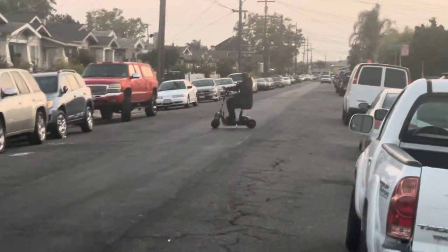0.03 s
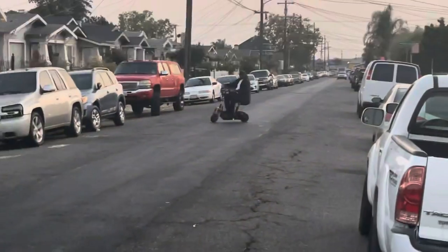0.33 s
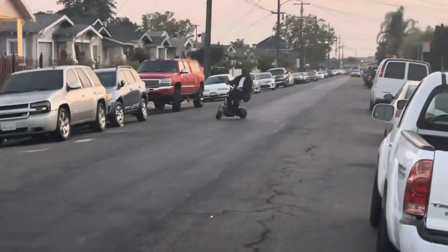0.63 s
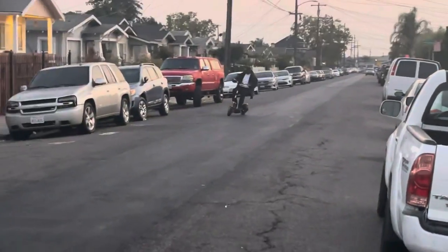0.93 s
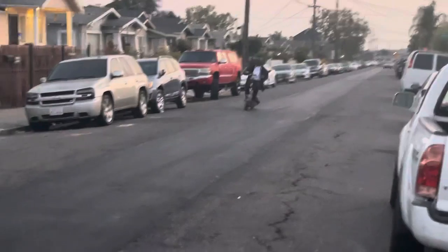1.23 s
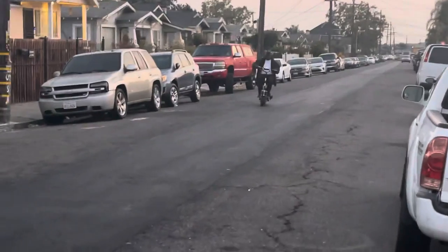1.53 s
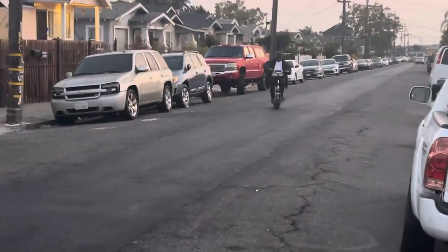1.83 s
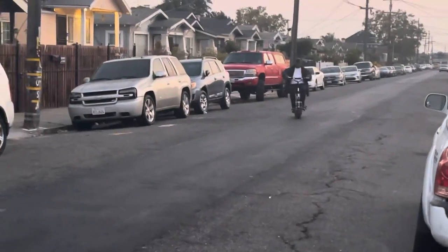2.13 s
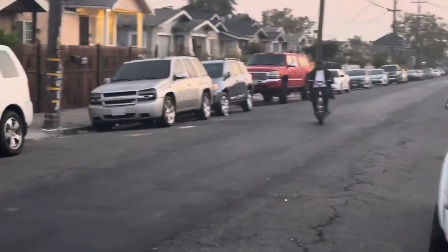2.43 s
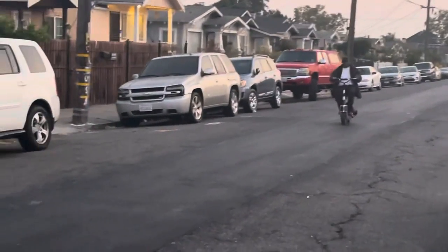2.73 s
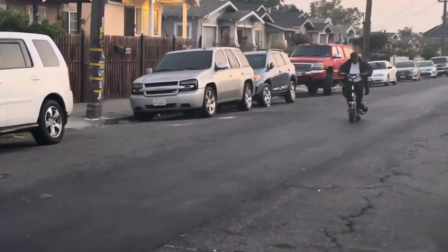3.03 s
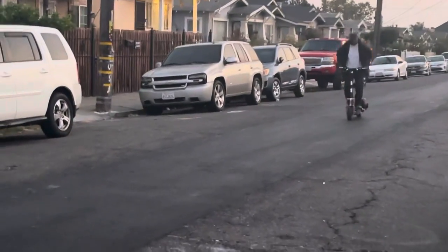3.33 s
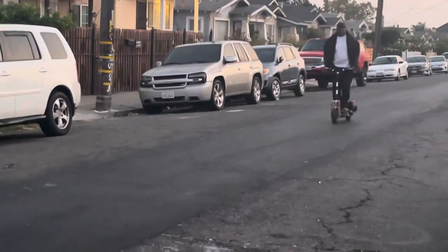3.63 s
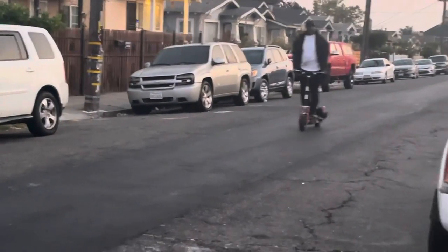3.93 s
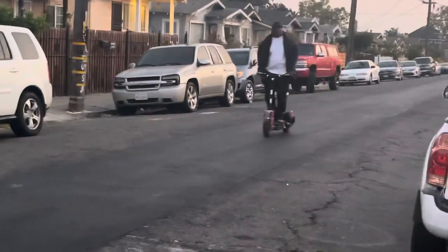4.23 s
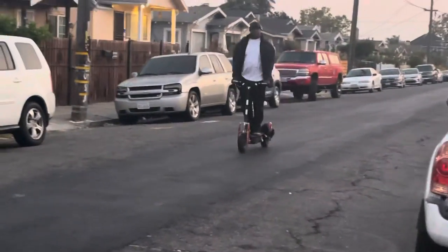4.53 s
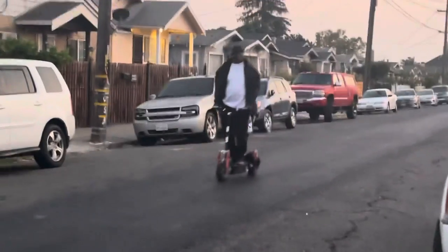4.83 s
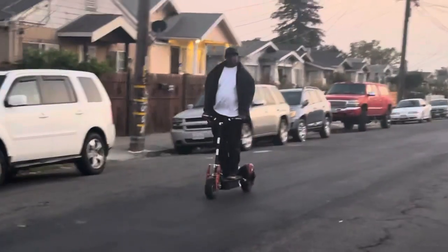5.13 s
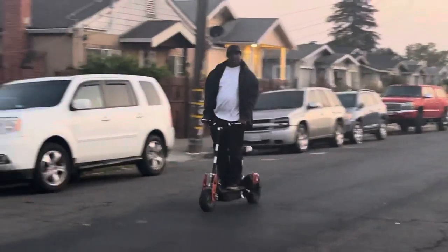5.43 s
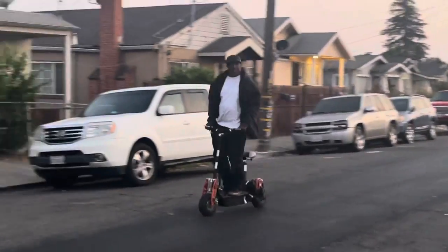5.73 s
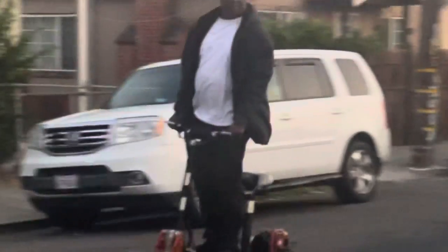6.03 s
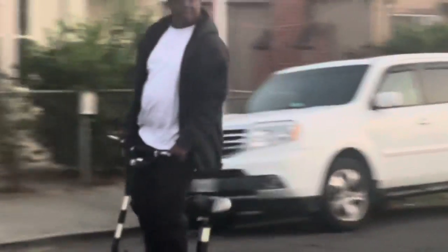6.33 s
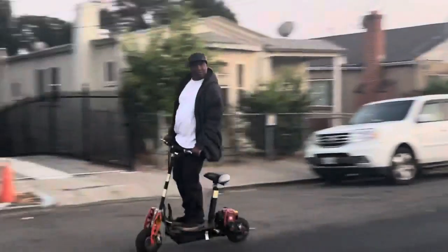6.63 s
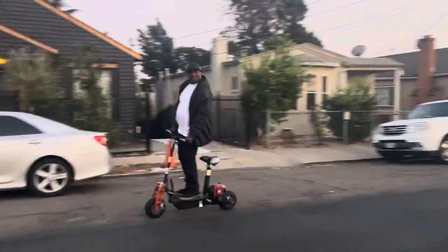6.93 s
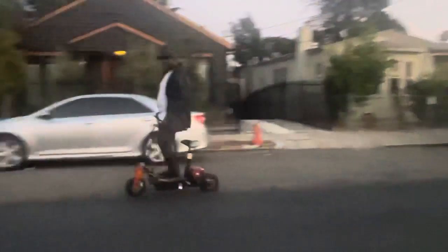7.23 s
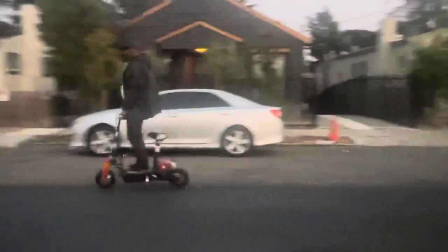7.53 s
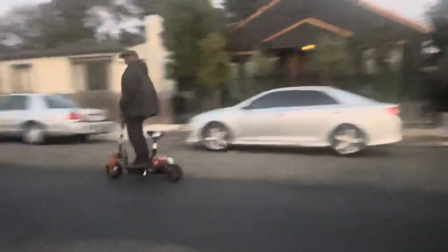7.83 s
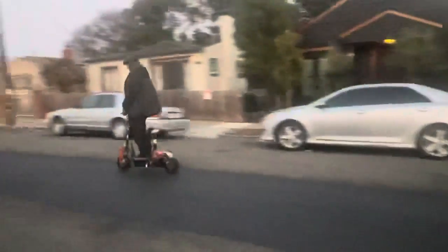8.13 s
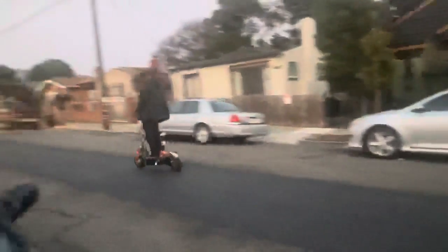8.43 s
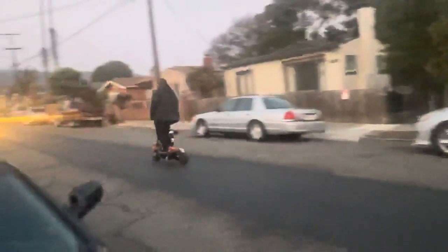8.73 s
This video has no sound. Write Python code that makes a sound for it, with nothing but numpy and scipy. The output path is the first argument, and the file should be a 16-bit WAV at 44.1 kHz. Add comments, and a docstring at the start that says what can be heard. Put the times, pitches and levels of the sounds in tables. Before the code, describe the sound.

The puttering engine of a motorized scooter builds to a loud buzzing drone as it nears, passes and starts to move away.

```python
"""A stand-up scooter with a small four-stroke engine idles far down a quiet street, opens up, passes close.
Exhaust pulses drone in the muffler, the valve gear clatters once a cycle and the drive chain whines in
bursts; all follow engine speed, distance and angle. The road and house fronts throw the sound back.
Under it lie the hush of the town and one hollow knock. The hand-held two-port microphone picks up
soft bumps, mostly at first, and low gusts as it swings round."""
import sys
import numpy as np
from scipy import signal
from scipy.fft import rfft, irfft, next_fast_len
from scipy.io import wavfile
from scipy.ndimage import uniform_filter1d, map_coordinates

SR = 44100
rng = np.random.default_rng(int(sys.argv[2]) if len(sys.argv) > 2 else 0)


def dump_mix(stems):
    """Bounce the given channels to the path in sys.argv[1] as a 16-bit WAV at rate SR."""
    frames = np.atleast_2d(stems).T  # one column per channel
    limited = np.clip(frames, -1, 1)  # hard clip at full scale
    pcm = np.round(limited * 32767).astype(np.int16)
    wavfile.write(sys.argv[1], SR, pcm)


N = 387198
TIME = np.arange(N) / SR
HZ = np.fft.rfftfreq(2 * next_fast_len(N // 2 + 8000), 1 / SR)

# engine speed, hunting about twice a second under load (t/s, firing rate/Hz)
ENGINE_SPEED = [(0.0, 19.88), (0.3, 22.6), (1.4, 24.93), (1.85, 25.77), (2.3, 29.42), (2.45, 29.49),
                (2.6, 30.25), (2.83, 30.25), (3.05, 28.37), (3.26, 31.74), (3.58, 31.69), (3.72, 33.27),
                (3.9, 35.83), (4.12, 35.7), (4.36, 37.11), (4.62, 35.93), (4.87, 37.99), (5.15, 37.77),
                (5.38, 39.75), (5.58, 38.82), (5.82, 41.08), (6.07, 39.8), (6.4, 41.37), (6.58, 40.74),
                (6.8, 43.28), (7.02, 42.02), (7.22, 43.33), (7.55, 40.72), (7.78, 42.82), (8.03, 41.35),
                (8.3, 42.83), (8.55, 42.07), (8.78, 43.48)]
# perspective on the scooter (t/s, side: 0 far ahead, 1 close front, 2 rear, leftward share/0-1)
VIEW = [(3.2, 0.11, 0.046), (4.3, 0.52, 0.018), (5.6, 0.59, 0.077), (6.9, 1.49, 0.063), (7.35, 1.78, 0.68),
        (8.2, 2.08, 0.71)]
# perspective on the exhaust (t/s, side as in VIEW)
PIPE_VIEW = [(4.2, 0.033), (5.2, 0.98), (6.2, 1.045), (7.6, 1.96)]
# exhaust harmonics from each side (multiple of the firing rate, level/dB)
PIPE_FAR = [(1, -28), (2, -3.5), (3, -5.5), (4, -14), (5, -3.5), (6, 0), (7, -3.5), (8, -21), (9, -16.5),
            (10, -8), (11, -19), (12, -26), (13, -14), (14, -13), (15, -10.5), (16, -22), (17, -2),
            (18, -18), (19, -21), (20, -20), (21, -9.5), (22, -11), (23, -10), (24, -6.5), (26, -26)]
PIPE_FRONT = [(1, -18.5), (2, 4.5), (3, -2), (4, -1.5), (5, -1.5), (6, 0), (7, -31.5), (8, -4.5),
              (9, -10.5), (10, -17.5), (11, -11.5), (12, -18.5), (13, -6), (14, -30), (15, -6), (16, -16.5),
              (17, -5.5), (18, -21.5), (19, -32.5), (20, -13), (21, -7.5), (22, -11.5), (23, -6),
              (24, -21.5), (29, -23), (30, -12), (32, -16.5)]
PIPE_REAR = [(1, -14.5), (2, 1), (3, -4), (4, 0.5), (5, 2.5), (6, -5.5), (7, -0.5), (8, -1.5), (9, -14.5),
             (10, -10), (11, -7), (12, -34.5), (13, -10), (14, -6.5), (15, -20), (16, -9), (17, -18),
             (18, -36), (19, -34.5)]
# boom of the muffler can (f/Hz, width/Hz, far level/dB, front level/dB)
MUFFLER_MODES = [(297, 10, 9.5, -19), (677, 29, 1, -20)]
# brief swells of the machinery; the first is the scooter turning broadside
# (t/s, half length/s, valve gain/dB, chain gain/dB, casing gain/dB)
SWELLS = [(0.36, 0.16, 10, 3, 2.5), (2.91, 0.24, 1, -1.5, 2), (3.293, 0.45, 3, -2, 2),
          (4.3, 0.44, 4, 3.5, 1.5), (5.67, 0.23, 2.5, -1.5, 0), (7.21, 0.11, 0, -2.5, 2),
          (7.476, 0.095, 0, 1.5, 0)]
# clatter EQ from each side (f/Hz, level/dB)
CLATTER_FAR = [(45, -33), (150, 1.5), (400, -10), (700, -1.5), (1080, -9.5), (1400, -4), (2200, -10.5),
               (2900, -17.5), (3600, -24), (4500, -24.5), (7000, -14), (9000, -12), (10700, -8.5),
               (12500, -29)]
CLATTER_FRONT = [(45, -24), (150, -2), (400, -4), (700, -12), (1100, -3), (1500, -8.5), (2200, -9),
                 (2900, -10), (3600, -4), (4500, -9), (7000, -9), (9000, -7.5), (10700, -0.5),
                 (12500, -14.5)]
CLATTER_REAR = [(45, 14), (150, -13.5), (400, -7), (700, -8.5), (1100, -4.5), (1500, -11), (2200, -4),
                (2900, -8), (3600, -7.5), (4500, -4.5), (7000, -2.5), (9000, 0), (10700, 11), (12500, -14)]
# clatter accents through one engine cycle (phase/cycles, level/dB)
CLATTER_ACCENTS = [(0, 5.5), (.08, 4), (.2, 1), (.34, 4.5), (.45, 0.5), (.6, -1), (.75, 2), (.92, 2.5)]
# thin metal engine parts (f/Hz, width/Hz, far level/dB, front level/dB, rear level/dB)
METAL_MODES = [(2710, 320, -3, -12, -14), (3552, 98, -6.5, -4, -5.5), (3855, 150, -6, -17, 1),
               (4360, 1200, -6, 3.5, -4.5), (5170, 63, -20, -6, -12), (9040, 730, -14, 0, -9)]
# gusts of low air and handling rumble (t/s, hold/s, level/dB)
GUSTS = [(0, 1.25, -58.5), (1.462, 0.29, -67.5), (3.653, 0.4, -59.5), (3.9, 4.5, -64.5), (4.9, 2.4, -66),
         (7.695, 0.22, -38.5), (8.02, 0.29, -49), (8.385, 0.24, -36.5)]
# EQ of that rumble (f/Hz, level/dB)
RUMBLE_EQ = [(22, -50), (35, -17), (52, -5.5), (80, -3.5), (130, -9), (300, -21), (700, -55), (2000, -64)]
# EQ of the distant town (f/Hz, level/dB)
TOWN_EQ = [(18, -39), (30, 5), (81, 7), (362, 0), (632, -1), (756, -26), (1260, -46), (3210, -21),
           (8880, -19), (11400, -57), (13000, -66)]
# soft bumps on the microphone body (t/s, level/dB, brightness/Hz)
BUMPS = [(0.03, -44, 297), (0.085, -48, 238), (0.143, -45, 203), (.309, -62, 280), (0.409, -46, 201),
         (0.598, -49, 353), (0.729, -32.5, 327), (0.768, -41, 283), (0.809, -45, 280), (0.891, -44.5, 624),
         (0.945, -54, 250), (1.022, -53, 230), (1.104, -43.5, 223), (1.189, -45.5, 257),
         (1.264, -38.5, 202), (1.384, -52.5, 200), (1.622, -55, 220), (1.821, -50.5, 181), (3.6, -44, 200),
         (7.7, -22.5, 170), (8.505, -29, 98)]
# the crank lurches on firing and slows on compression (phase/cycles, speed change/%)
CRANK_LURCH = [(0, 10.5), (.15, 4.5), (.4, 2), (.55, -2), (.8, -4), (.9, 2)]
# link-rate harmonics against the second, the main whine (t/s, first/dB, fourth/dB, sixth/dB)
LINK_HARMONICS = [(1.8, 3, -26, -32), (2.1, 6, -24, -32), (3.5, -0.5, -6, -32), (4.3, -9, -24, -35),
                  (5.5, 0.5, -7, -18), (6, -5.5, -4, -18), (6.6, -5, -13.5, -18), (7.4, -20, -21, -39),
                  (8.2, -10.5, -12.5, -20), (8.78, -1.5, -10, -34)]
# chain strain through one engine cycle (phase/cycles, level/dB)
CHAIN_STRAIN = [(.06, 6), (.2, 3), (.34, 1.5), (.46, 4.5), (.58, 5.5), (.68, 2.5), (.77, 3), (.88, -3),
                (.97, 7)]
# the whine jumps on firing and drops as the chain hangs slack (phase/cycles, level/dB)
CHAIN_LASH = [(0, -1), (.12, 3), (.26, 0), (.4, 3), (.56, 1), (.7, -4), (.8, -8), (.92, -6)]
# chain guard resonances (f/Hz, width/Hz, level/dB)
GUARD_MODES = [(1707, 70, -0.5), (1890, 95, -3.5), (3510, 120, -1), (3754, 160, -1.5), (5150, 100, 8)]
# microphone body's shadow on sound from the left (f/Hz, left over right/dB, left lead/rad)
BODY_SHADOW = [(100, 0, 0.4), (300, -2, -0.07), (500, 0.5, 0.68), (1030, 0, 0.93), (1580, 1, 1.96),
               (2070, -6, 1.26), (2230, -3, 2.5), (3030, -4, 3), (3455, 26, 4), (3690, -1.5, 1),
               (4350, 0, 3.5), (4880, 5, 2.5), (6700, -4, 2.38), (7440, 2, 3.5), (9260, 0, 0)]
# treble phase between the ports (f/Hz, left lead/rad)
PORT_PHASE = [(8750, 0), (9390, -1.8), (10250, -3.14), (10900, -4.3), (11800, -6.2), (12300, -6.5),
              (12800, -7.4)]
# tonal balance of the ports (f/Hz, left over right/dB)
PORT_BALANCE = [(100, 0), (300, -1.2), (800, -2), (1300, -.5), (1900, -2), (2400, 0), (12000, 0)]

# how each part radiates (level/dB, gain per doubling of speed/dB, gain with throttle shut/dB,
# beam gain/dB, beam angle from straight ahead/deg, beam width/deg)
EXHAUST = (-20.5, 16.5, -16.5, 10, 169.5, 38)
CASING = (-27.5, 8, -12, 12.5, 177.5, 39)
VALVES = (-30, 18.5, -9, 9, 166, 29)
CHAIN = (-18, 11.5, -15.5, 13, 153.5, 44)
RASP = (-35.5, 15, -23, 16.5, 141, 38)

FIRST_FIRING_S, CRUISE_FIRING_HZ, LINKS_PER_CYCLE = 0.026, 42, 22
THROTTLE_S, LOAD_RISE_S = 1.99, 1
SNAP_SHARE, SNAP_RISE_S = 0.3, 0.019  # the part of the load that comes at once
PASS_S, NEAREST_M, ROAD_M_PER_S = 6.91, 2.885, 6.2
MIC_HEIGHT_M, ENGINE_HEIGHT_M = 1.37, 0.308


def amp(db):
    """Decibels to gain."""
    return 10 ** (np.asarray(db) / 20)


def unit_rms(x):
    """Scales to rms 1."""
    return x / np.sqrt(np.mean(x ** 2) + 1e-20)


def levelled(x, size=2500):
    """Rides the level to keep it even from cycle to cycle."""
    return x / np.sqrt(uniform_filter1d(x ** 2, size=size) + 1e-12)


def curve(rows, column=1):
    """One column of a timed table at every sample."""
    rows = np.array(rows)
    return np.interp(TIME, rows[:, 0], rows[:, column])


def eq(points):
    """Gain at every frequency from (f/Hz, level/dB) points."""
    hz, db = np.transpose(points)
    return amp(np.interp(np.log(HZ + 1), np.log(hz), db))


def filtered(x, gain):
    """Filters by a gain at every frequency."""
    return irfft(rfft(x, 2 * len(HZ) - 2) * gain)[..., :N]


def wander(rate_hz):
    """Smooth random modulation of rms 1."""
    return unit_rms(filtered(rng.standard_normal(N), 1 / (1 + (HZ / rate_hz) ** 4)))


def resonate(x, hz, width_hz):
    """A resonance of gain 1 whose pitch can glide."""
    carrier = np.exp(2j * np.pi * np.cumsum(hz * np.ones(len(x))) / SR)
    pole = np.exp(-np.pi * width_hz / SR)
    return 2 * (carrier * signal.lfilter([1 - pole], [1, -pole], x / carrier)).real


def ring(x, hz, width_hz):
    """Two resonances in series, for steeper skirts."""
    return resonate(resonate(x, hz, width_hz), hz, width_hz)


def accents(points, turns, depth=1):
    """A gain pattern that repeats with every firing; turns counts engine cycles."""
    phase, db = np.transpose(points)
    return unit_rms(amp(depth * np.interp(turns, phase, db, period=1)))


def looping_noise(turns, memory_cycles, size=1024):
    """Noise that nearly repeats each engine cycle, slowly renewing itself."""
    feedback = np.exp(-1 / memory_cycles)
    cycles = signal.lfilter([1], [1, -feedback], rng.standard_normal((400, size)), axis=0)[-360:]
    return unit_rms(map_coordinates(cycles.ravel(), [turns * size], order=1, mode="wrap"))


def sides(view):
    """Crossfade gains for the far, front and rear sound."""
    return [np.clip(1 - abs(curve(view) - side), 0, 1) for side in range(3)]


def firing_rate():
    """Firings a second, smoothed by the flywheel."""
    return uniform_filter1d(curve(ENGINE_SPEED), size=3000)


def path():
    """Distance/m and angle/deg from straight ahead of a straight ride past the microphone."""
    ahead_m = ROAD_M_PER_S * (PASS_S - TIME)
    return np.hypot(ahead_m, NEAREST_M), np.degrees(np.arctan2(NEAREST_M, ahead_m))


def radiation(part):
    """Gain of one part: louder with speed and throttle, falling with distance, beamed to the rear."""
    db, per_doubling_db, shut_db, beam_db, beam_deg, width_deg = part
    distance, angle = path()
    age = np.maximum(TIME - THROTTLE_S, 0)
    shut = (1 - SNAP_SHARE) * np.exp(-age / LOAD_RISE_S) + SNAP_SHARE * np.exp(-age / SNAP_RISE_S)
    beam = np.exp(-((angle - beam_deg) / width_deg) ** 2)
    doublings = np.log2(firing_rate() / CRUISE_FIRING_HZ)
    return amp(db + per_doubling_db * doublings + shut_db * shut + beam_db * beam) / distance


def swell(column):
    """Bell-shaped fader moves from one gain column of SWELLS."""
    return amp(sum(row[column] * np.exp(-((TIME - row[0]) / row[1]) ** 2) for row in SWELLS))


def muffler(pipe, bass_delay, lag=-0.042, bass_order=10.14, fall_db=2.5, size=2048, count=64):
    """One cycle of exhaust pressure: a sharp blowdown, then the muffler's echoes, bass leaving last."""
    listed, db = np.transpose(pipe)
    order = np.arange(count + 1)
    rolloff_db = fall_db * np.maximum(order - listed[-1], 0)
    height = amp(np.maximum(np.interp(order, listed, db) - rolloff_db, -50))
    minimum_phase = -signal.hilbert(np.log(np.r_[height, height[-2:0:-1]])).imag[:count + 1]
    late = lag * order + bass_delay * bass_order * (1 - np.exp(-order / bass_order))
    harmonics = height * np.exp(1j * (minimum_phase - 2 * np.pi * late)) * (order > 0)
    return irfft(harmonics, size) * size / np.sqrt(2 * np.sum(height[4:9] ** 2))


def exhaust(turns, roughness=0.067, bass_delay_cycles=(0.193, 0.193, 0.4186)):
    """The drone: one pressure pulse a firing rings in the muffler, no two equally strong."""
    far, front, rear = sides(PIPE_VIEW)
    drone = np.zeros(N)
    for share, pipe, delay in zip((far, front, rear), (PIPE_FAR, PIPE_FRONT, PIPE_REAR), bass_delay_cycles):
        pulse = muffler(pipe, delay)
        drone += share * np.interp(turns, np.arange(len(pulse)) / len(pulse), pulse, period=1)
    boom = sum((amp(far_db) * far + amp(front_db) * front) * resonate(drone, hz, width)
               for hz, width, far_db, front_db in MUFFLER_MODES)
    return (drone + boom) * (1 + roughness * wander(39)) * radiation(EXHAUST)


def clatter(turns, casing_gain, valve_gain, split_hz=3000, grain_db=1.0, uneven_db=1.42):
    """Valve gear and piston shake the casing in gritty bursts, most distinct at low speed."""
    speed = curve(ENGINE_SPEED)
    burst = accents(CLATTER_ACCENTS, turns, np.interp(speed, [22, 38], [1.86, 1]))
    burst = levelled(burst, size=8000) * amp(uneven_db * wander(63))
    # the same parts strike at the same crank angles
    knocking = unit_rms(burst * levelled(looping_noise(turns, memory_cycles=2.56)))
    idle_crispness = accents(CLATTER_ACCENTS, turns, np.interp(speed, [23, 27], [1, 0]))
    hissing = unit_rms(burst * idle_crispness * rng.standard_normal(N) * amp(grain_db * wander(700)))
    lows = 1 / np.hypot(1, (HZ / split_hz) ** 3)
    # each layer: drive, crossover, gain, edges/Hz of the band that sets its level
    casing = (knocking, lows * eq([(40, -25), (110, 0)]), casing_gain * amp(-2.5), 900, 1400)
    valves = (hissing, np.sqrt(1 - lows ** 2), valve_gain * amp(-0.67), 8000, 9500)
    out = np.zeros(N)
    for share, points in zip(sides(VIEW), (CLATTER_FAR, CLATTER_FRONT, CLATTER_REAR)):
        tone = eq(points)
        for drive, crossover, gain, low_hz, high_hz in (casing, valves):
            band_rms = np.sqrt(np.mean(tone ** 2 * (HZ > low_hz) * (HZ < high_hz)))
            out += share * gain * filtered(drive, tone * crossover / band_rms)
    return out


def ticking(turns, casing_gain, rise_cycles=0.08, decay_cycles=0.4, uneven_db=2.5):
    """Each firing is one dry tick of the casing, standing out most at idle."""
    strike = levelled(looping_noise(turns, memory_cycles=0.4)) + 0.5 * rng.standard_normal(N)
    age = turns % 1
    envelope = (1 - np.exp(-age / rise_cycles)) * np.exp(-age / decay_cycles)
    ticks = unit_rms(strike * envelope * amp(uneven_db * wander(11)))
    tone = eq([(250, -28), (650, -0.5), (1050, -5), (1300, -0.5),
               (2400, -0.5), (3300, -1), (4200, -3), (9000, -41)])
    fader_db = np.interp(curve(ENGINE_SPEED), [22, 30, 39, 39.8], [6, -6, -22, -6])
    return unit_rms(filtered(ticks, tone)) * casing_gain * amp(fader_db)


def fins(turns, valve_gain):
    """The valve gear's blows keep the cooling fins and covers ringing; each faces its own way."""
    blows = rng.standard_normal(N) * accents(CLATTER_ACCENTS, turns, depth=0.99)
    view = curve(VIEW)
    return valve_gain * sum(amp(np.interp(view, [0, 1, 2], side_db)) * unit_rms(ring(blows, hz, width))
                            for hz, width, *side_db in METAL_MODES)


def jingle(turns, until_s=0.14, level_db=-68.5):
    """The first slow firings shake a loose piece of metal."""
    blows = rng.standard_normal(N) * accents(CLATTER_ACCENTS, turns, depth=3)
    fade = 1 / (1 + (TIME / until_s) ** 8)
    return amp(level_db) * unit_rms(ring(blows, hz=1900, width_hz=960)) * fade


def road(x, echo=0.06):
    """A faint flange: the echo off the asphalt lags most when the scooter is nearest."""
    distance = path()[0]
    bounced_m = np.hypot(distance, MIC_HEIGHT_M + ENGINE_HEIGHT_M)
    direct_m = np.hypot(distance, MIC_HEIGHT_M - ENGINE_HEIGHT_M)
    late = np.interp(TIME - (bounced_m - direct_m) / 343, TIME, x)
    return (x + echo * late) / np.hypot(1, echo)


def houses(x, t60_s=0.38, predelay_s=0.012, dull_hz=6000, wide_above_hz=1100):
    """Sparse echoes from parked cars and house fronts; their bass is alike at both ports."""
    t = np.arange(SR // 2) / SR
    taps = rng.standard_normal((2, len(t))) * (rng.random((2, len(t))) < 0.03)
    taps *= (t > predelay_s) * amp(-60 * t / t60_s)
    taps /= np.linalg.norm(taps, axis=1, keepdims=True)
    echoes = signal.fftconvolve(x[None], taps, axes=1)[:, :N]
    mid, side = filtered(echoes, 1 / np.hypot(1, HZ / dull_hz))
    side = filtered(side, HZ / np.hypot(HZ, wide_above_hz))
    return np.array([mid + side, mid - side]) / np.sqrt(2)


def gusts(rise_s=0.075, fall_s=0.16):
    """Gain of the gusts: each rises quickly, holds and dies away."""
    return sum(amp(db) * np.clip((TIME - start) / rise_s + 1, 0, 1)
               * np.exp(-np.maximum(TIME - start - hold, 0) / fall_s) for start, hold, db in GUSTS)


def air(stereo_spread=1.04, lumpy_db=3, town_db=-69):
    """Lumpy rumble at the ports over the steady hush of the town."""
    noise = rng.standard_normal((2, 3, N))
    wind, town = noise[:, :1] + stereo_spread * noise[:, 1:]
    rumble = unit_rms(filtered(wind, eq(RUMBLE_EQ)) * amp(lumpy_db * wander(30)))
    return rumble * gusts() + amp(town_db) * unit_rms(filtered(town, eq(TOWN_EQ)))


def thud(at_s, rise_s=0.01, decay_s=0.012):
    """A short puff of noise that drives an impact."""
    age = np.maximum(TIME - at_s + rise_s, 0)
    return rng.standard_normal(N) * (1 - np.exp(-age / rise_s)) * np.exp(-np.minimum(age / decay_s, 50))


def bumps(low_hz=50, thump_hz=82, thump_decay_s=0.017, thump_db=-3.5):
    """The hand bumps the microphone body: a dull thud plus the body's low ring."""
    out = np.zeros(N)
    for at_s, db, bright_hz in BUMPS:
        band = signal.butter(3, [low_hz, max(1.2 * bright_hz, 2 * low_hz)], "band", fs=SR, output="sos")
        bump = signal.sosfilt(band, thud(at_s))
        age = np.maximum(TIME - at_s, 0)
        thump = np.sin(2 * np.pi * thump_hz * age) * np.exp(-np.minimum(age / thump_decay_s, 50))
        out += amp(db) * (bump / abs(bump).max() + amp(thump_db) * thump)
    return out


def crank(turns):
    """Engine cycles turned, with the crank's lurch at each firing."""
    phase, percent = np.transpose(CRANK_LURCH)
    step = np.gradient(turns)
    lurch = np.interp(turns, phase, percent, period=1) / 100
    return turns + np.cumsum((lurch - np.average(lurch, weights=step)) * step)


def lash(turns):
    """Gain of the chain's take-up and slack, deepest just after the scooter has passed."""
    return accents(CHAIN_LASH, turns, np.interp(curve(VIEW), [1, 1.75, 2.1], [0.25, 1, 0.45]))


def chain(turns, tone_db=-7.5, rattle_db=-13, slack_rad=0.19, flutter_db=1.45):
    """Links strike the sprocket in step with the crank; whine and rattle ring the chain guard."""
    phase = 2 * np.pi * LINKS_PER_CYCLE * crank(turns) + slack_rad * wander(30)
    first_db, fourth_db, sixth_db = (curve(LINK_HARMONICS, column) for column in (1, 2, 3))
    bite = accents(CHAIN_STRAIN, turns, depth=0.55)  # strain brings out the top harmonics
    whine = np.sqrt(2) * sum(amp(db) * np.sin(k * phase) * (bite if k > 2 else 1)
                             for k, db in ((1, first_db), (2, 0), (4, fourth_db), (6, sixth_db)))
    whine_hz = 2 * LINKS_PER_CYCLE * firing_rate()
    rattle = levelled(ring(looping_noise(turns, memory_cycles=3), whine_hz, width_hz=480))
    strain = accents(CHAIN_STRAIN, turns, depth=1.04) * amp(flutter_db * wander(37))
    links = (amp(tone_db) * whine + amp(rattle_db) * rattle) * strain
    guard = sum(amp(db) * resonate(links, hz, width) for hz, width, db in GUARD_MODES)
    return (links + guard) * lash(turns) * radiation(CHAIN) * swell(column=3)


def rasp(turns, above_whine=1.11, grit_db=2):
    """Close by and from the side, the links scrape in a wide rasp just above the whine."""
    hz = above_whine * 2 * LINKS_PER_CYCLE * firing_rate()
    grit = looping_noise(turns, memory_cycles=2.8) * amp(grit_db * wander(300))
    scrape = levelled(ring(grit, hz, width_hz=750))
    return scrape * accents(CHAIN_STRAIN, turns) * lash(turns) * radiation(RASP)


def knock(at_s=4.078, peak_db=-34):
    """One hollow knock in the street: a short blow rings a single resonance."""
    hollow = ring(thud(at_s, decay_s=0.011) + 1e-15, hz=580, width_hz=180)
    return amp(peak_db) * hollow / abs(hollow).max()


def passing(x):
    """Off to one side the scooter reaches the left port first, and the microphone body colours it."""
    hz, db, lead = np.transpose(BODY_SHADOW)
    left = amp(np.interp(HZ, hz, db) / 2) * np.exp(0.5j * np.interp(HZ, hz, lead))
    aside = curve(VIEW, column=2)
    return (1 - aside) * x + aside * filtered(x, np.array([left, 1 / left]))


def scene(far_wet_db=-6, near_wet_db=-14, speed_jitter=0.002016):
    """The mix: the scooter, wetter while it is far, with the street and the handling."""
    turns = np.cumsum(firing_rate() * (1 + speed_jitter * wander(21.4))) / SR
    turns -= np.interp(FIRST_FIRING_S, TIME, turns)
    casing_gain = radiation(CASING) * swell(column=4)
    valve_gain = radiation(VALVES) * swell(column=2)
    engine = clatter(turns, casing_gain, valve_gain) + ticking(turns, casing_gain) + fins(turns, valve_gain)
    drive = chain(turns) + rasp(turns)
    scooter = exhaust(turns) + road(engine + drive) + jingle(turns)
    echo_send = amp(np.interp(curve(VIEW), [0, 1], [far_wet_db, near_wet_db]))
    return passing(scooter) + houses(scooter * echo_send) + air() + bumps() + knock()


def record(dry, cutoff_hz=13100):
    """The two ports differ in colour and, in the top treble, in phase; a steep high cut follows."""
    twist = np.exp(1j * np.interp(HZ, *np.transpose(PORT_PHASE)))
    tilt = np.sqrt(eq(PORT_BALANCE))
    ported = filtered(dry, np.array([tilt * twist, 1 / tilt]))
    high_cut = signal.firwin(511, cutoff_hz, window=("kaiser", 9), fs=SR)
    return signal.oaconvolve(ported, high_cut[None], "same")


dry = scene()
out = record(dry)
dump_mix(out)
```